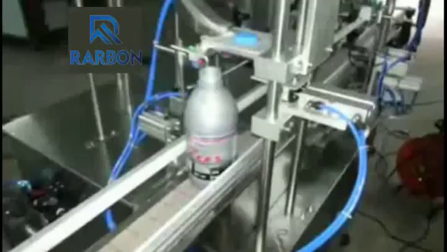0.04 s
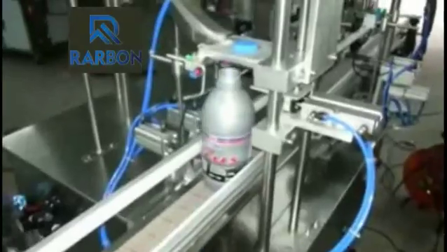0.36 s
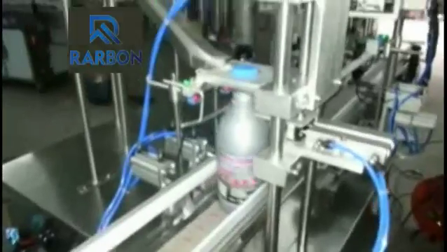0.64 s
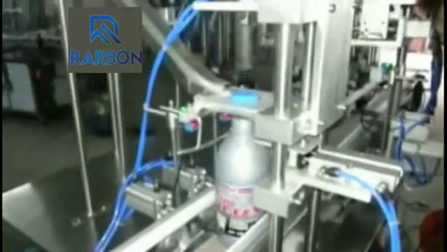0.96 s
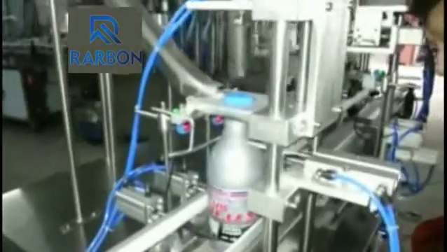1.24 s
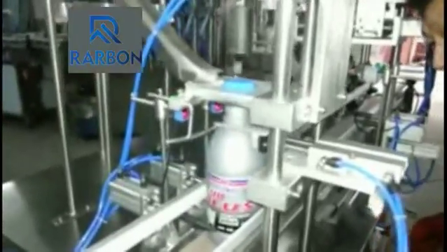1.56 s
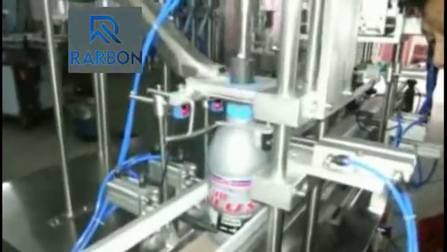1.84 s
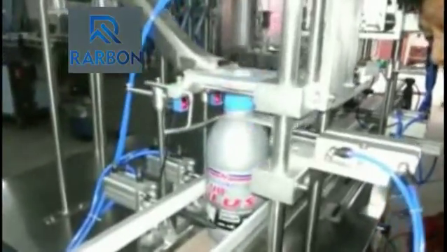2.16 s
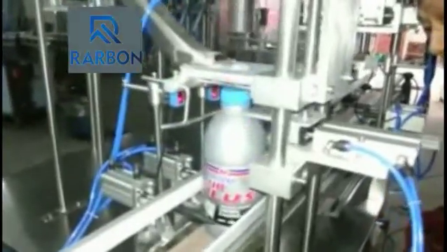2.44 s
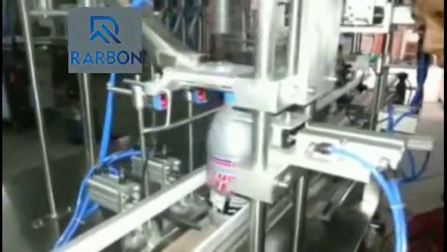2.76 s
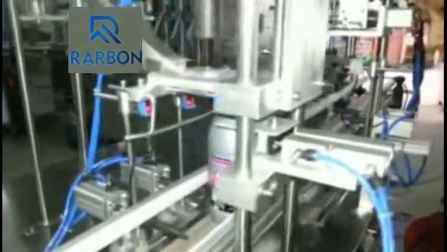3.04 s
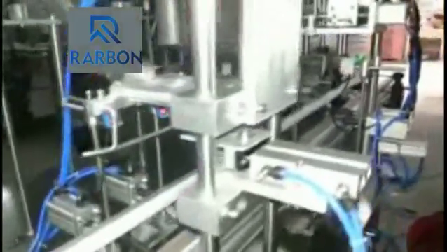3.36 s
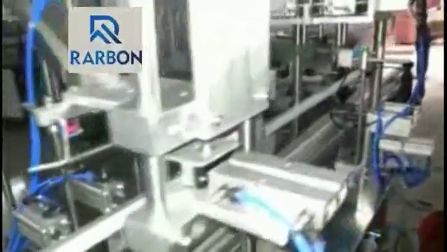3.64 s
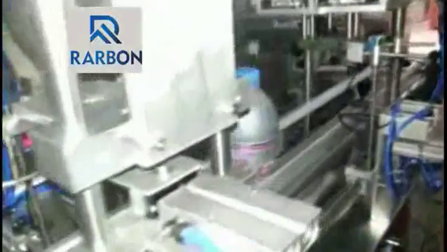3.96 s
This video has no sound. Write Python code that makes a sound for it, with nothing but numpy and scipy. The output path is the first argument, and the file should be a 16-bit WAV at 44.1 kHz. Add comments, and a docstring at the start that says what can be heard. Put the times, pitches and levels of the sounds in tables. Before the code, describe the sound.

A bottle capping machine runs one cycle: a bottle scrapes along rails, then bursts of air alternate with ringing steel clacks. A geared motor joins and keeps humming after the clacks stop, over slightly echoing factory noise.

```python
"""A pneumatic bottle capper works through one cycle in a factory hall.
A bottle scrapes in along the guide rails and air whistles thinly in the fittings. Valves vent in short
turbulent blasts, clamp and capping head clack against the ringing steel frame, the clamp slide groans.
A geared motor comes in after a second and hums on at multiples of its shaft rate; the capped bottle
slides away. Steel panels and the hall add echoes."""
import sys
import numpy as np
from scipy import signal
from scipy.fft import rfft, irfft
from scipy.io import wavfile

SR = 44100
rng = np.random.default_rng(int(sys.argv[2]) if len(sys.argv) > 2 else 0)


def master(y):
    """Save y as 16-bit WAV."""
    cut = np.clip(np.atleast_2d(y).T, -1, 1)
    pcm = np.round(cut * 32767)  # scale
    wavfile.write(sys.argv[1], SR, pcm.astype(np.int16))


N = 176400
T = np.arange(N) / SR
BINS_HZ = np.maximum(np.fft.rfftfreq(N, 1 / SR), 1)
SHAFT_HZ = 17.21

# Noise spectra. Each row: frequency in Hz, relative density in dB.
HALL_SPECTRUM = [(30, -55), (130, -29), (300, -9.5), (550, 1), (1100, 0), (2500, -6), (3400, -8),
                 (5200, -15), (6300, -18.5), (10000, -23.5)]
RAIL_SPECTRUM = [(200, -29.5), (600, -10), (1350, -2), (1800, -6), (2500, 0), (3100, -9), (5000, -14),
                 (9500, -22), (11000, -61)]
CRACK_SPECTRUM = [(30, -5), (130, -15.5), (280, 2), (650, -2), (1300, 1.5), (3400, 5), (6000, -1.5),
                  (10000, 6), (14000, -40)]
ECHO_SPECTRUM = [(100, 3), (600, -4.5), (3500, -5), (12000, -5)]
JET_SPECTRUM = [(30, -14), (120, -16.5), (280, -3.5), (600, 6.5), (1400, 2.5), (2000, 3), (2500, 2.5),
                (3100, 4.5), (4500, 1), (6000, -4), (10000, -5), (13000, -13), (14500, -23)]
WHIRR_SPECTRUM = [(30, -23), (150, -18), (290, -9), (430, -2), (530, -4.5), (760, 0.5), (1050, -9.5),
                  (1450, -24), (2000, -6.5), (2700, -3.5), (3450, 1), (4500, -12), (6000, -17), (9000, -23),
                  (10000, -58)]
# Envelopes. Each row: time in seconds, gain in dB.
HALL_ENVELOPE = [(0.2, -1), (0.52, 3), (0.82, -1), (1.15, 1.5), (1.6, 2), (2.4, 4), (3.0, -7), (4, -6)]
RUB_ENVELOPE = [(0.19, -33.5), (0.228, -19), (0.248, -22.5), (0.275, -16), (0.32, -21), (0.38, -33.5),
                (0.48, -26), (0.7, -34.5), (0.9, -47), (2.3, -38), (2.58, -35), (2.71, -26.5), (2.8, -27.5),
                (3.05, -36), (4, -37)]
MOTOR_ENVELOPE = [(1.1, -53), (1.25, -4.5), (1.5, 2), (2.1, 1.5), (2.4, 3), (2.8, 2), (3.3, 0.5), (4, -0.5)]
HUM_ENVELOPE = [(1.2, -14), (1.9, -10.5), (2.15, -5), (2.45, -2.5), (4, .5)]
GROAN_ENVELOPE = [(1.17, -71), (1.21, -29.5), (1.243, -23.5), (1.265, -29.5), (1.305, -26.5), (1.34, -41),
                  (1.55, -32), (1.7, -33.5), (1.8, -75)]
THROB_ENVELOPE = [(2.0, -25), (2.9, -7), (3.35, -5), (3.65, -0.5)]
# Air leaks. Each row: start in seconds, end in seconds, width as a fraction of pitch, level in dB.
WHISTLES = [(0.11, 0.82, 0.0054, -46), (1.02, 1.215, 0.0036, -41), (0.89, 1.074, 0.027, -39),
            (0.85, 1.066, 0.11, -34.5), (0.081, 3.95, 0.033, -49), (0.16, 3.95, 0.021, -47.5)]
# Pitch of each leak in Hz.
WHISTLE_HZ = [5420, 4620, 3100, 4250, 9950, 4620]
# Bottle chatter on the rails. Each row: time in seconds, band centre in Hz, level in dB.
CHATTER = [(0.19, 1732, -47), (0.23, 1770, -19), (0.251, 1767, -22.5), (0.277, 1850, -16.5),
           (0.319, 1837, -29.5), (0.38, 1794, -39), (0.9, 1860, -58), (2.45, 2150, -31.5),
           (2.581, 2075, -27), (2.71, 1779, -23.5), (2.771, 1642, -32), (2.949, 1577, -37)]
# Bottle resonances. Each row: frequency in Hz, boost in dB.
BOTTLE_MODES = [(1770, 9.5), (1950, 9), (2300, 0)]
# Spools and metal parts hit their stops. Each row: start in seconds, level in dB, low edge in Hz,
# contact cut-off in Hz, pan in dB, the part's own note in Hz, its relative level in dB.
CLACKS = [(0.199, -20.5, 600, 3000, -2, 950, -3.5), (0.811, -28.5, 303, 1760, 0, 650, -8),
          (0.9, -14, 800, 4870, 5, 3530, -6), (1.082, -29, 300, 1660, -2, 1250, 3),
          (1.348, -18, 796, 3970, 0, 3970, -1.5), (1.514, -17, 402, 1890, 2, 1840, -5.5),
          (1.521, -15, 452, 1320, -2, 900, -3), (1.543, -25, 452, 1000, 3, 584, 1),
          (1.75, -18, 900, 4970, 0, 3790, -9), (1.829, -13, 396, 4080, -2, 2100, -9),
          (1.836, -17, 300, 4000, -1, 3310, 0), (1.858, -12.5, 398, 4970, 3, 3200, -2),
          (1.869, -17, 100, 4520, 2, 582, 0), (1.871, -15, 200, 5900, -7, 5130, -1),
          (1.875, -16, 202, 5960, 2, 3600, 2), (1.9033, -15.5, 2000, 5900, -4.5, 3437, 2.5),
          (1.971, -15, 1027, 7900, -3.5, 1923, -12), (2.333, -17, 810, 1670, -3, 1353, -7),
          (2.364, -23.5, 450, 1113, 2, 704, 1), (2.531, -28, 900, 4000, 6, 3618, 7),
          (2.713, -17.5, 704, 2210, 0, 1830, -17)]
# Steel frame resonances. Each row: frequency in Hz, level in dB, T60 in seconds.
FRAME_MODES = [(598.4, -14.5, 0.11), (852, -6, 0.053), (1155, -13, 0.19), (1783, -6.5, 0.092),
               (2030, -4.5, 0.11), (2362, -9.5, 0.085), (3035, -8, 0.042), (3184, -6, 0.043),
               (3380, -13, 0.19), (3580, -3.5, 0.096), (3790, -2.5, 0.017), (5030, 1, 0.07),
               (5530, -11, 0.045), (7000, 1, 0.05)]
# Valves vent. Each row: start in seconds, level in dB, hold in seconds, T60 in seconds, port resonance
# in Hz, its boost in dB, treble gain in dB, pan in dB, valve body ring in Hz, its boost in dB.
BLASTS = [(0.89, -17.5, 0.031, 0.17, 3840, 7.5, 2.5, -1, 3080, 6.5),
          (1.343, -17, 0.029, 0.27, 3860, 1, -3, 0.5, 3420, 3.5),
          (1.745, -15.5, 0.015, 0.87, 3400, 7.5, 3, 0.5, 3770, 3.5),
          (1.806, -21.5, 0.1, 0.059, 4440, 15.5, 19.5, 2.5, 3440, 12),
          (2.129, -14.5, 0.033, 0.099, 4440, 7.5, 2.5, 1, 5290, 9),
          (2.193, -15.5, 0.0053, 0.047, 6250, 7.5, 7.5, 0, 5400, 9),
          (2.524, -18.5, 0.017, 0.34, 3586, 5, -2, 0, 3770, 2),
          (3.558, -32.5, 0.035, 0.15, 5200, -1, -9, -1, 5380, -4)]
# Strong shaft harmonics. Each row: harmonic number, level in dB.
GEAR_LINES = [(26, -42), (27, -31.5), (34, -37), (40, -45), (42, -38), (43, -44), (49, -41.5), (50, -36.5),
              (52, -43.5)]
# Curve for all other harmonics. Each row: frequency in Hz, level in dB.
WEAK_LINES = [(200, -68), (380, -58), (520, -56), (750, -66), (950, -54), (1300, -60)]
# Gearbox pulses. Each row: place in the turn from 0 to 1, Gaussian width in turns, pitch in Hz,
# glide in Hz per turn, level in dB.
THROBS = [(.45, .12, 385, 0, -35), (.86, .16, 750, -480, -28)]
# Stereo width of noise. Each row: frequency in Hz, left-right correlation.
CORRELATION = [(40, 1), (130, 0.99), (330, 0.98), (650, 0.83), (1200, 0.012), (4000, -0.013),
               (12000, -0.074)]
# Stereo balance. Each row: frequency in Hz, left minus right in dB.
BALANCE = [(500, -0.5), (1000, 0.2), (2500, 1.2), (5000, -0.5), (10000, -2)]


def from_db(db):
    """Decibels to gain."""
    return 10 ** (np.asarray(db) / 20)


def unit_rms(x):
    """Scale to rms 1."""
    return x / np.sqrt(np.mean(x ** 2) + 1e-20)


def envelope(rows):
    """Gain over time from (s, dB) points."""
    return from_db(np.interp(T, *np.transpose(rows)))


def at_hz(points, hz):
    """Read a table on a log-frequency axis."""
    point_hz, value = np.transpose(points)
    return np.interp(np.log(hz), np.log(point_hz), value)


def panned(db):
    """Left and right gains, db apart."""
    return from_db([[db / 2], [-db / 2]])


def drift(rate_hz):
    """Low-passed random motion, rms 1."""
    return unit_rms(irfft(rfft(rng.standard_normal(N)) / (1 + (BINS_HZ / rate_hz) ** 2), N))


def colour(points):
    """Gain per bin from (Hz, dB) points."""
    return from_db(at_hz(points, BINS_HZ))


def resonance(hz, width_hz):
    """Squared response of one resonance, peak 1."""
    return 1 / (1 + ((BINS_HZ ** 2 - hz ** 2) / (BINS_HZ * width_hz)) ** 2)


def noise(gain):
    """Coloured stereo noise, correlated in the bass, rms 1."""
    mid, side = rfft(rng.standard_normal((2, N)))
    alike = np.clip(at_hz(CORRELATION, BINS_HZ), -1, 1)
    stereo = np.sqrt(1 + alike) * mid + np.sqrt(1 - alike) * side * [[1], [-1]]
    return unit_rms(irfft(gain * stereo, N))


def bed_noise(spectrum, top_hz=10280):
    """Steady noise with a steep top edge."""
    return noise(colour(spectrum) / np.hypot(1, (BINS_HZ / top_hz) ** 30))


def decay(age_s, t60_s):
    """1 until age 0, then an exponential fall."""
    return from_db(-60 * np.clip(age_s / t60_s, 0, 4))


def casing(x, count=12, first_s=0.002, last_s=0.022, echo_db=-3):
    """Early reflections off steel panels comb each side differently."""
    echoes = np.zeros((2, N))
    for side in range(2):
        for lag_s, sign in zip(rng.uniform(first_s, last_s, count), rng.choice([-1, 1], count)):
            lag = int(SR * lag_s)
            echoes[side, lag:] += sign * x[side, :-lag] / np.sqrt(count)
    return (x + from_db(echo_db) * echoes) / np.hypot(1, from_db(echo_db))


def hall_wash(base_db=-31.5, flutter_db=2.0):
    """The rest of the line blurs into fluttering noise."""
    wash = from_db(base_db + flutter_db * drift(19.5)) * bed_noise(HALL_SPECTRUM)
    return envelope(HALL_ENVELOPE) * casing(wash)


def air_whistles(edge_s=0.083):
    """Air escapes the fittings in faint narrow bands."""
    out = np.zeros((2, N))
    for hz, (start_s, end_s, width, db) in zip(WHISTLE_HZ, WHISTLES):
        gate = np.clip(np.minimum(T - start_s, end_s + edge_s - T) / edge_s, 0, 1)
        out += from_db(db) * gate * noise(resonance(hz, width * hz))
    return out


def bottle_scrape(in_width_hz=130, out_width_hz=290, capping_s=1.5, grain_db=1.1, pan_db=-0.5):
    """Grainy rail friction rings the bottle; it chatters narrowly going in, roughly going out."""
    times_s, hz, db = np.transpose(CHATTER)
    phase = 2 * np.pi * np.cumsum(np.interp(T, times_s, hz)) / SR
    white = rfft(rng.standard_normal((2, 2, N)))
    narrow, rough = (unit_rms(irfft(white / (1 + (BINS_HZ / width_hz) ** 2), N))
                     for width_hz in (in_width_hz, out_width_hz))
    wobble = np.where(T < capping_s, narrow, rough)
    band = wobble[0] * np.cos(phase) + wobble[1] * np.sin(phase)
    chatter = from_db(np.interp(T, times_s, db)) * band
    body = 1 + sum((from_db(mode_db) - 1) * resonance(mode_hz, width_hz=90)
                   for mode_hz, mode_db in BOTTLE_MODES)
    friction = envelope(RUB_ENVELOPE) * noise(colour(RAIL_SPECTRUM) * body)
    grain = unit_rms(from_db(grain_db * drift(200)))
    return panned(pan_db) * (chatter + friction) * grain


def metal_clacks(ring_db=-5, scatter_db=3.5, attack_s=0.00033):
    """Crack, frame modes and the part's own note; light parts lack bass, soft contacts lack treble."""
    out, age_s = np.zeros((2, N)), T[:SR // 2]
    mode_hz, mode_db, t60_s = np.transpose(FRAME_MODES)[:, :, None]
    cracks = noise(colour(CRACK_SPECTRUM))
    attack = np.minimum(age_s / attack_s, 1)
    for start_s, db, low_hz, contact_hz, pan_db, note_hz, note_db in CLACKS:
        span = slice(int(start_s * SR), int(start_s * SR) + len(age_s))
        strength = from_db(ring_db + mode_db + scatter_db * rng.standard_normal((2, len(mode_hz), 1)))
        phase = rng.uniform(0, 2 * np.pi, strength.shape)
        modes = strength * decay(age_s, t60_s) * np.sin(2 * np.pi * mode_hz * age_s + phase)
        blow = (modes.sum(axis=1) + cracks[:, span] * decay(age_s, t60_s=0.055)) * attack
        band = signal.lfilter(*signal.butter(2, contact_hz, fs=SR), blow)
        band = signal.lfilter(*signal.butter(2, low_hz, "high", fs=SR), band)
        note_phase = 2 * np.pi * note_hz * age_s + rng.uniform(0, np.pi, (2, 1))
        note = attack * decay(age_s, t60_s=0.03) * np.sin(note_phase)
        clack = unit_rms(band) + from_db(note_db) * unit_rms(note)
        out[:, span] += from_db(db) * panned(pan_db) * blow.std() * clack
    return out


def reverb(x, wet_db=-7.5, t60_s=0.4, build_s=0.008):
    """Diffuse echoes from casing and hall."""
    tail = (noise(colour(ECHO_SPECTRUM)) * decay(T, t60_s) * np.minimum(T / build_s, 1))[:, :SR]
    tail /= np.sqrt((tail ** 2).sum(axis=1, keepdims=True))
    return x + from_db(wet_db) * signal.fftconvolve(x, tail, axes=1)[:, :N]


def valve_blasts(open_s=0.003, seep_s=0.011, seep_db=-8, bleed_db=-2.5,
                 port_q=1.7, frame_db=1, treble_hz=6140, flutter_db=1.5):
    """Each valve seeps, opens, holds and empties; port, valve body and frame colour its turbulent jet."""
    out = np.zeros((2, N))
    frame = 1 + sum(from_db(frame_db + db) * resonance(hz, width_hz=19) for hz, db, _ in FRAME_MODES)
    air = colour(JET_SPECTRUM) * frame
    for start_s, db, hold_s, t60_s, port_hz, port_db, treble_db, pan_db, ring_hz, ring_db in BLASTS:
        port = 1 + (from_db(port_db) - 1) * resonance(port_hz, port_hz / port_q)
        ring = 1 + (from_db(ring_db) - 1) * resonance(ring_hz, width_hz=130)
        shelf = from_db(treble_db / (1 + (treble_hz / BINS_HZ) ** 4))
        jet = noise(air * port * ring * shelf)
        age_s = T - start_s
        seep = from_db(seep_db) * np.exp(np.clip(age_s / seep_s, -20, 0))
        opening = np.maximum(np.clip(age_s / open_s, 0, 1), seep)
        bleed = from_db(bleed_db) * decay(age_s - hold_s, t60_s=0.48)  # the cylinder empties slowly
        emptying = np.hypot(decay(age_s - hold_s, t60_s), bleed)
        out += from_db(db) * panned(pan_db) * opening * emptying * jet
    return out * from_db(flutter_db * drift(108))


def gear_hum(wander=0.0006, jitter_rad=0.0045, waver_db=0.6, spread_rad=0.33):
    """Harmonics of a slightly uneven shaft, a few lifted by gears and housing."""
    shaft_hz = SHAFT_HZ * (1 + wander * drift(4.2))
    angle = 2 * np.pi * np.cumsum(shaft_hz) / SR + jitter_rad * drift(30)
    strong_db = {round(k): db for k, db in GEAR_LINES}
    wavers = [from_db(waver_db * drift(3)) for _ in range(5)]
    out = np.zeros((2, N))
    for k in range(12, 66):
        hz = k * SHAFT_HZ
        db = strong_db.get(k, at_hz(WEAK_LINES, hz))
        phase = k * angle + rng.uniform(0, 2 * np.pi)
        stereo_rad = spread_rad * (hz / 600) ** 2 * rng.choice([-1, 1]) * np.array([[1], [-1]])
        out += from_db(db) * wavers[k % len(wavers)] * np.sin(phase + stereo_rad)
    return out


def motor(whirr_db=-30.5):
    """Gear hum and throb over the whirr of bearings and belt."""
    whirr = from_db(whirr_db) * bed_noise(WHIRR_SPECTRUM)
    hum = envelope(HUM_ENVELOPE) * gear_hum()  # stands out as the motor settles
    return envelope(MOTOR_ENVELOPE) * (hum + gear_throbs() + casing(whirr))


def clamp_groan():
    """The sliding clamp judders in one narrow resonance."""
    return envelope(GROAN_ENVELOPE) * noise(resonance(hz=685, width_hz=60))


def gear_throbs(scatter_db=1.5):
    """Each turn the gears give a low bump and a falling chirr, never quite the same."""
    out = np.zeros(N)
    for place, width_turns, hz, glide_hz_per_turn, db in THROBS:
        turn, within = np.divmod(T * SHAFT_HZ - place + 0.5, 1)
        turn = turn.astype(int) + 1
        offset_turns = within - 0.5
        phase, size = rng.standard_normal((turn[-1] + 1, 2))[turn].T
        cycles = (hz * offset_turns + glide_hz_per_turn * offset_turns ** 2 / 2) / SHAFT_HZ
        pulse = np.exp(-0.5 * (offset_turns / width_turns) ** 2)
        out += from_db(db + scatter_db * size) * pulse * np.sin(2 * np.pi * cycles + phase)
    return envelope(THROB_ENVELOPE) * out


def scene():
    """One capping cycle over the running line."""
    cycle = reverb(metal_clacks()) + casing(valve_blasts()) + casing(bottle_scrape()) + clamp_groan()
    mix = cycle + air_whistles() + motor() + hall_wash()
    balance = from_db(at_hz(BALANCE, BINS_HZ) * np.array([[0.5], [-0.5]]))
    return irfft(rfft(mix) * balance, N)


def record(dry):
    """Round the peaks, fade in after a short silence, cut the top."""
    ceiling, start_s, fade_s, cutoff_hz = 0.92, 0.17, 0.039, 14400
    rounded = dry / (1 + (dry / ceiling) ** 6) ** (1 / 6)
    fade = np.clip((T - start_s) / fade_s, 0, 1) ** 2
    lowpass = signal.ellip(10, 0.1, 80, cutoff_hz, fs=SR, output="sos")
    return signal.sosfilt(lowpass, rounded * fade)


dry = scene()
out = record(dry)
master(out)
```